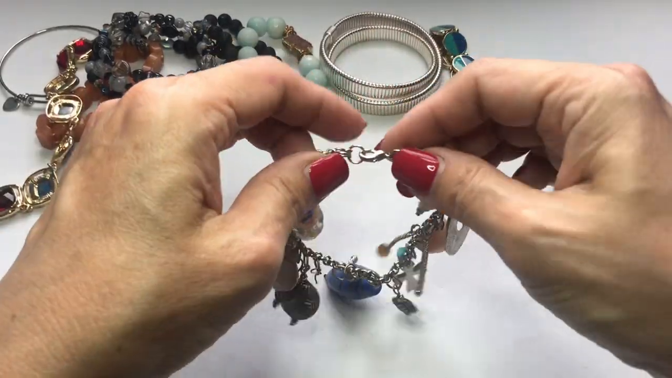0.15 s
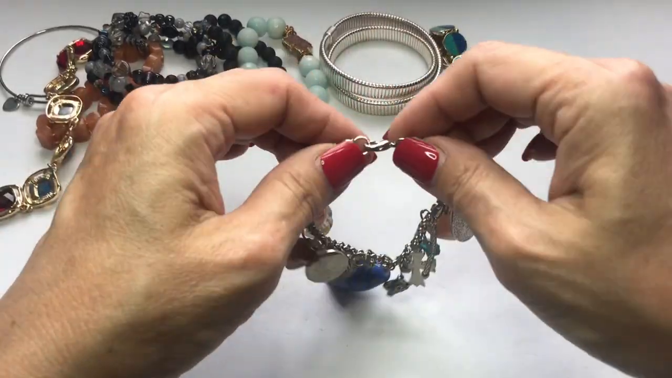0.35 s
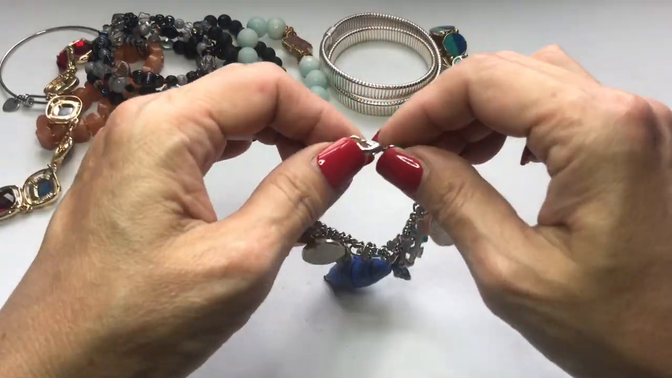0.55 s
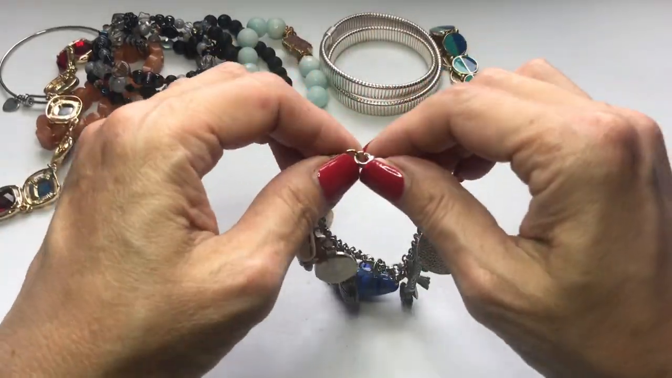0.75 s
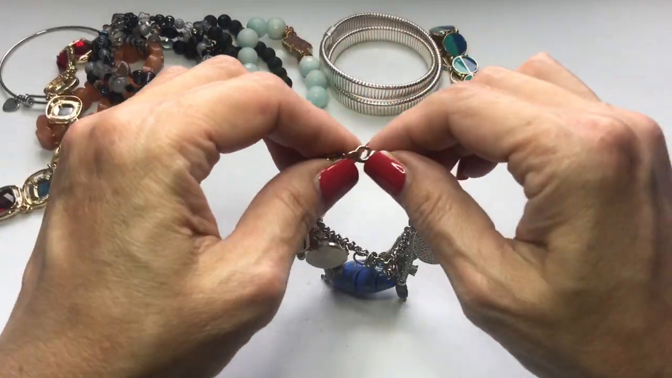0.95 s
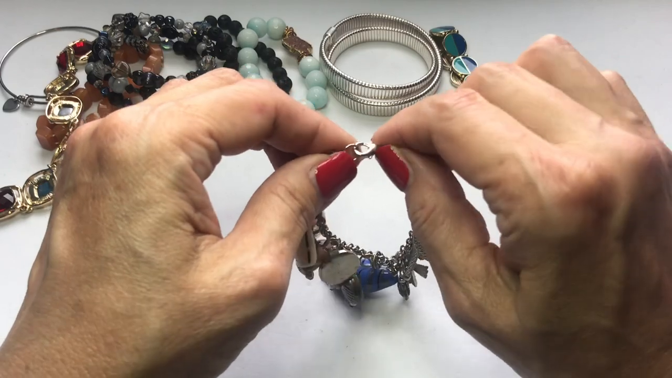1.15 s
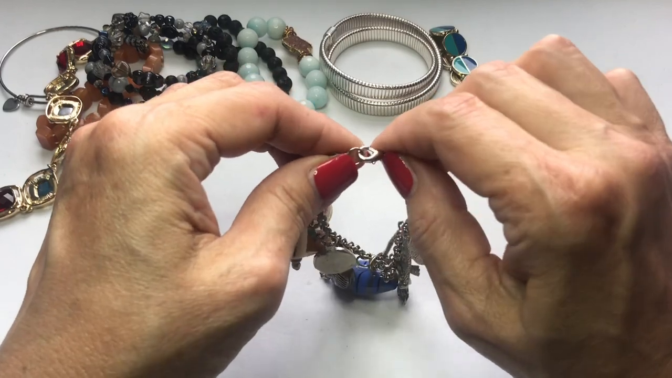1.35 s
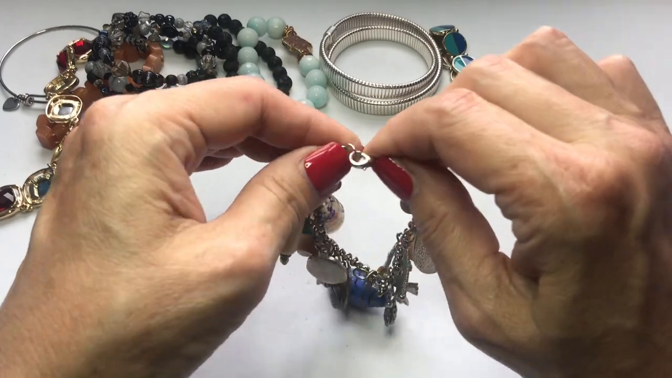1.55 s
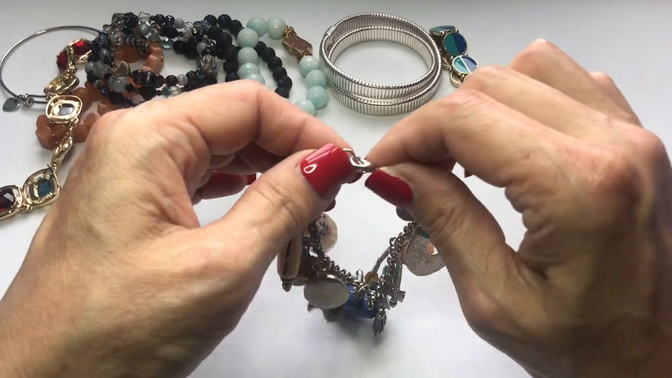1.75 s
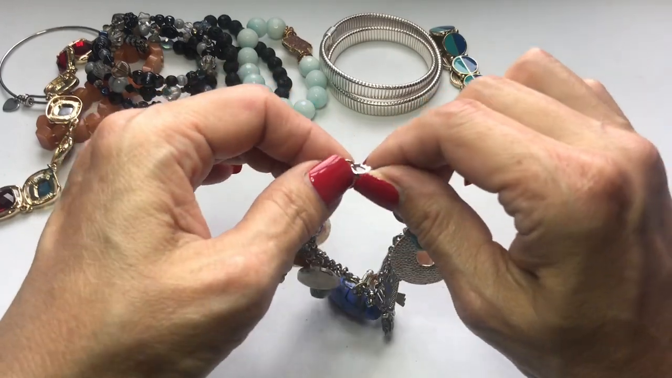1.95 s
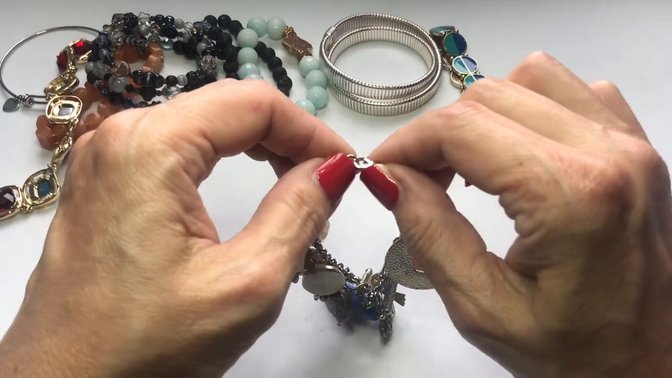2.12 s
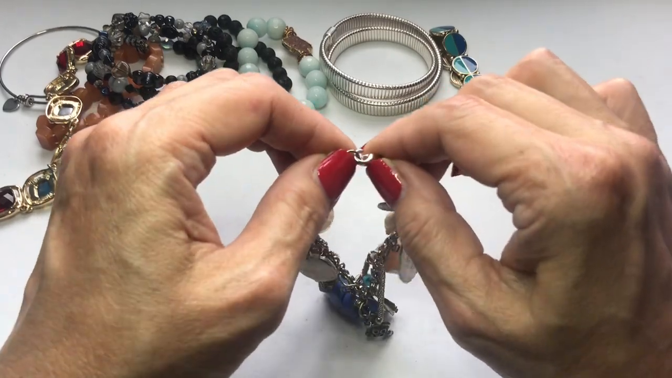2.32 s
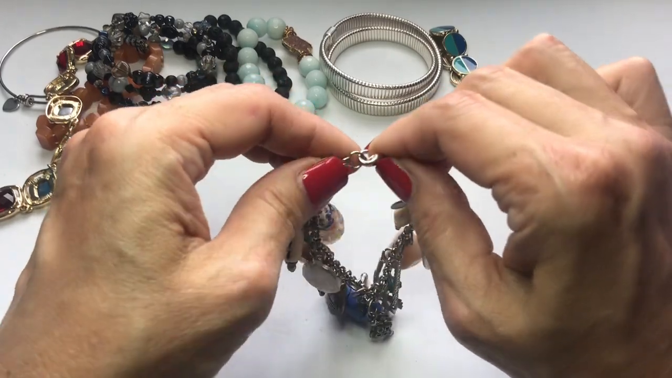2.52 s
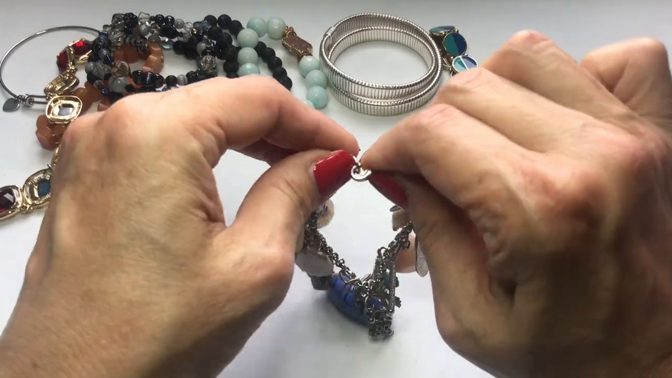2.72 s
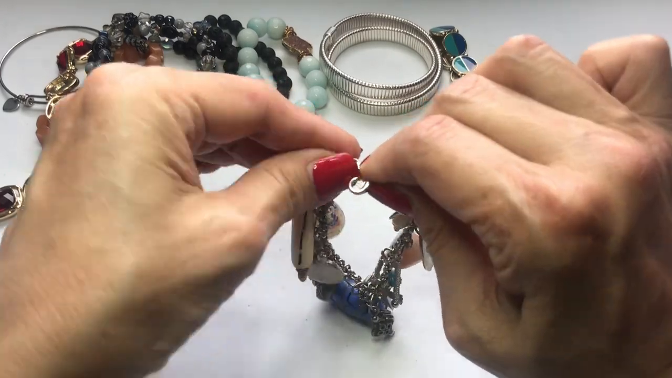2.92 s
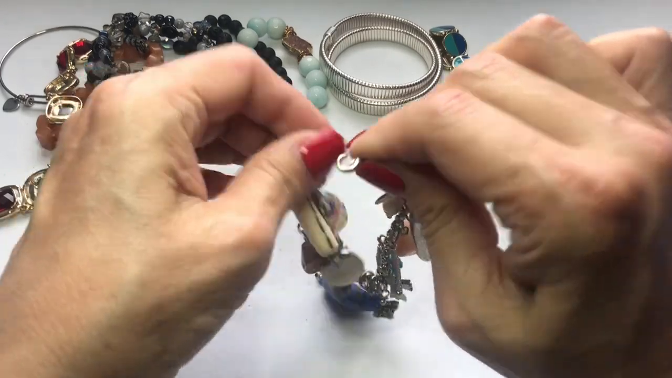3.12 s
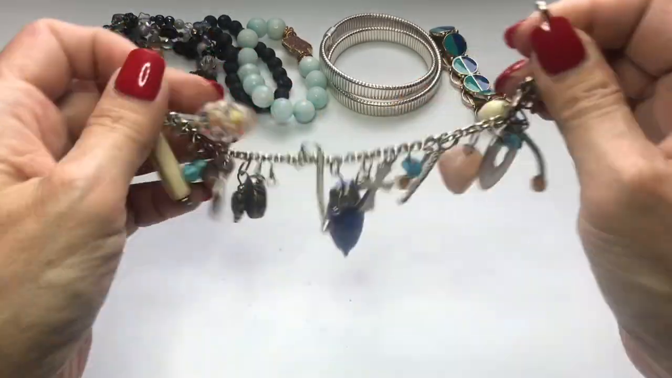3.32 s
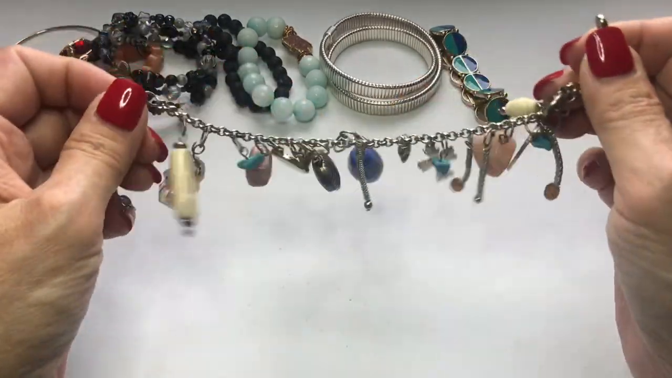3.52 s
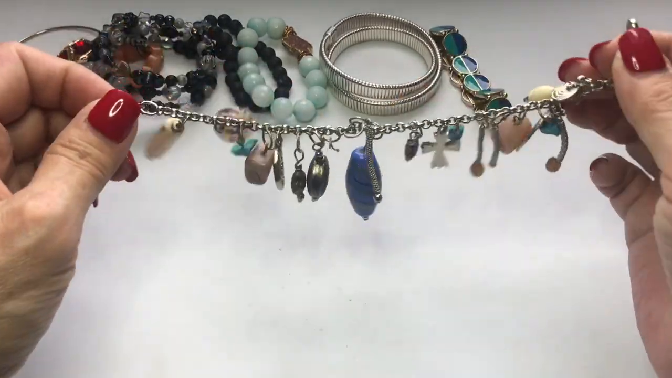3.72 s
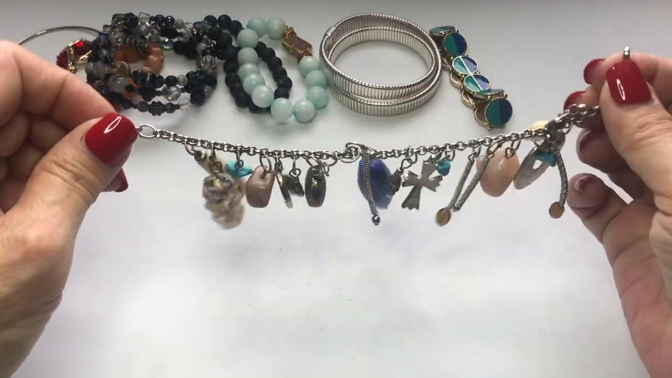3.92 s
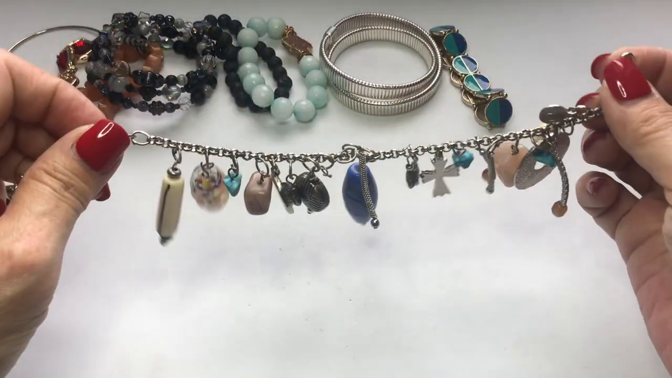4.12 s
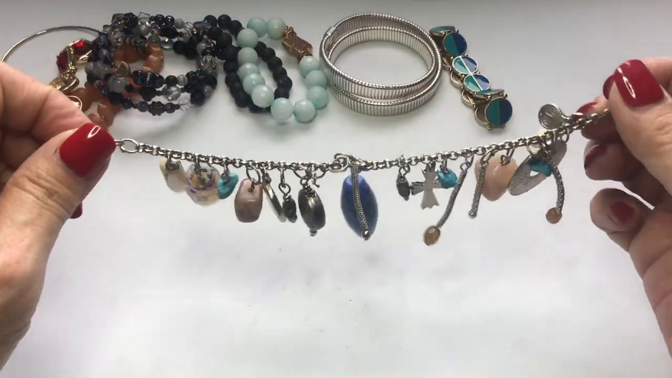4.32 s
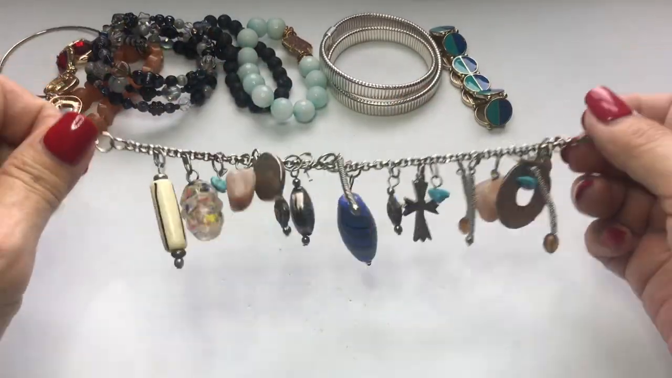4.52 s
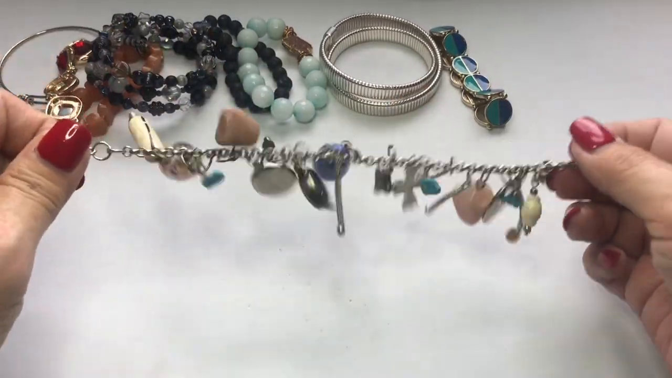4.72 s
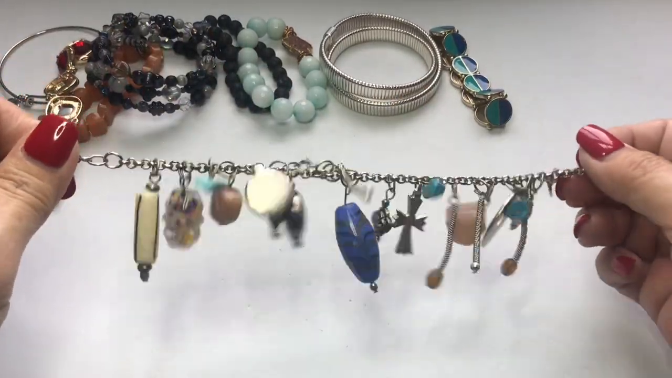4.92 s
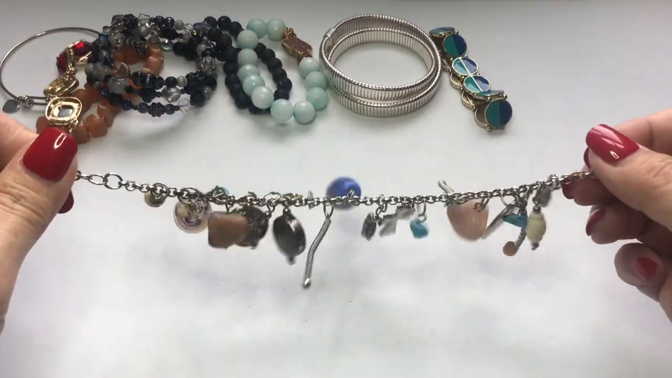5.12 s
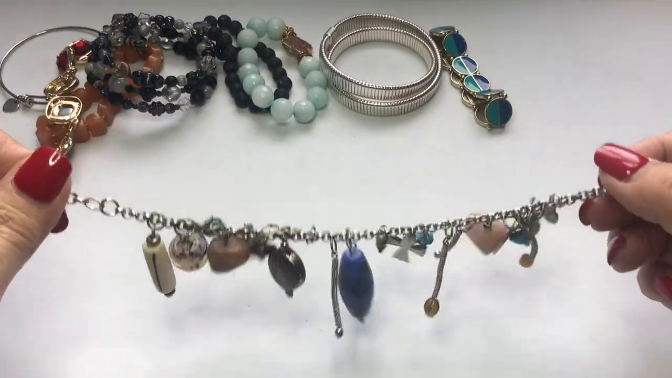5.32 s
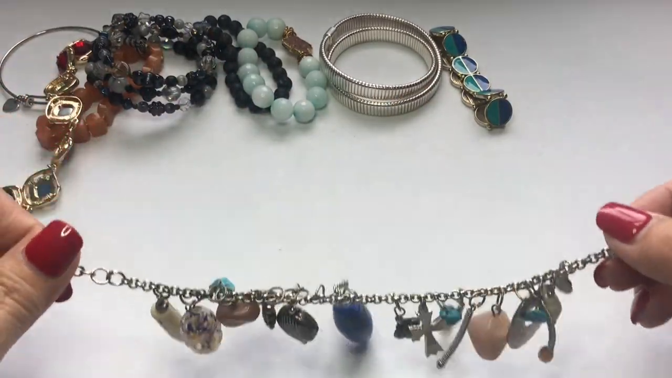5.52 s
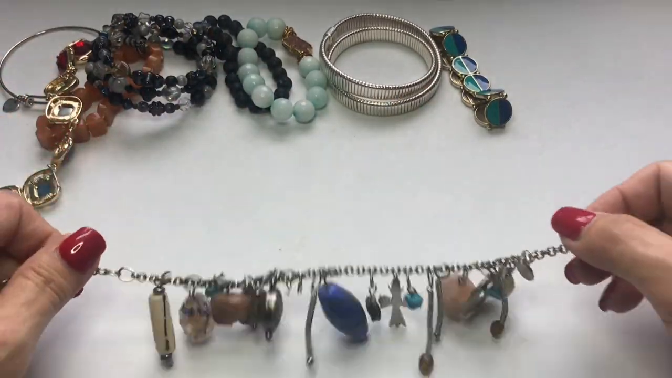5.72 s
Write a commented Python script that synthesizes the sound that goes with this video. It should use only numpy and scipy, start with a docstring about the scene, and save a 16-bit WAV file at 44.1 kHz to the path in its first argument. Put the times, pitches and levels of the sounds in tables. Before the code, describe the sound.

Close-up of a charm bracelet handled in a quiet room. A brief cluster of dry clicks and tiny rings opens it, then only isolated faint ticks for a couple of seconds. From about three seconds links and beads clatter in bright, irregular bursts, loudest when the chain is stretched and when it is shaken. Faint skin rustle, low hum, rumble and thin hiss lie underneath; the close microphone catches little echo.

```python
"""Two hands open a charm bracelet over a table in a quiet room, stretch it out and tip it to and fro.
At first there is hum, rumble, air and hiss, made of a sine and filtered noise; the chain rattles and rubs.
Beads and links soon clack as short filtered knocks; a flat charm, a pendant and small charms ring as tones.
The knocks thin out, then crowd together from about three seconds on, when a glass drop joins them.
Soft deep swells come and go; the low rumble is stronger near the end."""
import sys
import numpy as np
from scipy import signal
from scipy.fft import rfft, irfft, next_fast_len
from scipy.io import wavfile
from scipy.ndimage import uniform_filter1d

SR = 44100
rng = np.random.default_rng(int(sys.argv[2]) if len(sys.argv) > 2 else 0)


def transcribe(u):
    """Save the signal u as a 16-bit wav file named by the first command-line argument.

    u: samples, shape (n,) or (channels, n), limited to [-1, 1]; the rate is SR.
    q: integer samples, one column per channel.
    """
    v = np.clip(np.atleast_2d(u).T, -1, 1)
    q = np.round(v * 32767).astype(np.int16)
    wavfile.write(sys.argv[1], SR, q)


N = 254178  # length in samples

# Colour of the steady air and hiss, shape only: pitch_hz, level_db
AIR_COLOUR = [(20, -2.5), (200, 10.5), (400, 2.5), (800, -2.5), (1500, -7), (5000, -14), (7000, -23),
              (10500, -29), (14300, -20.5), (15700, -22.5), (15950, -55)]
AIR_DB = -67.5  # overall level of air and hiss
# Level of the mains hum over time: time_s, level_db
HUM_LEVEL = [(0, -59), (3.44, -60), (3.52, -81), (3.95, -68), (4.03, -65), (4.4, -56.5), (5.76, -60)]
HUM_HZ = 120.6
# Level of the low drone and rumble over time: time_s, level_db
LOW_LEVEL = [(0, -61), (1.4, -62.5), (1.65, -58), (2, -62), (2.25, -61), (3.75, -58.5), (4.07, -61),
             (4.45, -52.5), (5, -53.5), (5.76, -52)]
# Peaks of the rumble and of the drone: pitch_hz, width_hz, level_db
RUMBLE_PEAKS = [(48.3, 37, -1), (73, 25, -9), (103, 17, -9.5)]
DRONE_PEAKS = [(154.3, 78, 0.5), (211, 46, -14), (239.6, 35.4, 0), (344, 41.4, -6.5)]
RUMBLE_DB = -1.5  # against the drone
# Level of the faint chain rattle over time: time_s, level_db
RATTLE_LEVEL = [(0, -59.5), (.11, -65.5), (.3, -74), (.4, -72.5), (1.14, -76), (2.02, -71), (2.77, -75),
                (3.05, -68.5), (3.3, -57), (3.62, -60), (3.8, -69.5), (4.17, -72), (4.56, -66.5),
                (4.72, -52.5), (4.94, -57), (5.45, -70.5), (5.6, -68), (5.76, -61.5)]
LINK_HZ = 6480  # ring of the chain links
TICKS_PER_S = 450  # average rate of the larger link ticks
FINE_PER_S, FINE_DB = 2500, -6.0  # finest ticks of links sliding on links, against the larger ones
BRUSH_DB = -34  # how strongly the ticking links brush the flat charm
# Other small charms, one tone each: start_s, pitch_hz, level_db, time_to_fall_60_db_s
SMALL_CHARMS = [(.005, 6230, -60, .15), (.025, 2470, -59, .2), (.105, 2500, -64, .2), (.146, 2450, -64, .2),
                (.176, 2450, -60, .12), (.139, 8800, -57, .03), (.234, 5350, -47, .035),
                (.234, 8800, -52, .045), (3.245, 7940, -59, .045), (3.531, 11300, -56, .045)]
# Rustle of skin and sleeve: middle_s, length_s, level_db, centre_hz
RUBS = [(0.01, 0.066, -62.5, 2540), (0.322, 0.034, -68.5, 1090), (1.313, 0.024, -70, 1240),
        (1.47, 0.13, -69, 2600), (1.622, 0.088, -73.5, 780), (2.462, 0.056, -68, 3000),
        (3.515, 0.59, -66, 1390), (4.624, 0.77, -68.5, 1320), (5.14, 1, -69.5, 970),
        (5.723, 0.15, -66.5, 1240)]
# Distinct knocks of beads and links: peak_s, peak_level_db,
# weight_db (added to the lows), sparkle_db (added to the highs)
CLACKS = [(0.047, -40, -12, 4), (.1748, -21, -3, -3), (0.182, -36, 1.5, 5), (.1886, -36, 4, -9),
          (.201, -23, -3, 4), (0.2106, -28, 4, 8), (.2336, -31, 7, 3), (.27, -39, 5, 4.5),
          (0.2769, -43, -6, 7), (.2916, -39, -1.5, 1.5), (.2995, -36, -1, 6), (0.3085, -40.5, 0, -13),
          (.318, -42, -6, -9), (0.3414, -46, -4, -8), (.413, -43, 8, 7), (.4319, -38, 3, 8),
          (0.4434, -34.5, 12, -5), (0.4502, -30, 8, 4.5), (.47, -40.5, -4, 15), (0.5513, -30.5, -2.5, 8.5),
          (0.58, -35.5, -1, 3.5), (0.7016, -43, -5, -4), (0.7664, -44.5, 4, -12), (0.817, -42.5, 1, -2),
          (.898, -47, 0.5, -12), (0.9565, -45, 2, 1), (1.04, -44, 8, 4.5), (1.5238, -42.5, 6, -5),
          (1.5417, -40, 5, -5), (1.579, -36.5, -15, -2), (1.6108, -30, 1, -4), (1.6836, -42.5, 3, -18),
          (1.8114, -32.5, 2, 2.5), (1.841, -39.5, -6, -5), (1.9218, -27.5, 4.5, -4), (1.997, -39, 0, 1),
          (2.0579, -22.5, -1, -2), (2.3437, -38, -2, 2), (2.5404, -27, -5, -0.5), (2.6665, -39.5, 7.5, -4),
          (2.7988, -27.5, -2, 3), (2.8502, -43, -6, -7), (2.9, -34, 14, 4), (2.9897, -41.5, 9, -9),
          (3.017, -28.5, -1, 4), (3.0268, -39.5, 0, -2), (3.0367, -34, -3, 1), (3.083, -20, -7.5, -3),
          (3.091, -38, 0, -9), (3.1102, -39, 3, -18), (3.148, -38.5, -10, 0), (3.215, -35, -4, -13),
          (3.2222, -22, -11, 0), (3.2382, -30.5, 10, -15), (3.2526, -35, -9, 4), (3.298, -24.5, -17, 6),
          (3.301, -22, -7, -3), (3.3138, -24.5, 2, 4), (3.3188, -23.5, 3, 4), (3.4064, -18.5, -3, 5),
          (3.4178, -28, -9, 3), (3.486, -19, 0.5, 4), (3.4938, -30, -3, -3), (3.4997, -28.5, 6, 5),
          (3.51, -30, -5, -6), (3.5156, -28, -4, -6), (3.5328, -31.5, -28, -13), (3.5554, -10.5, -6.5, 4),
          (3.581, -19.5, -4, 1), (3.6079, -30, 14, -5), (3.6212, -8.5, -4, 5), (3.644, -28, -6, 3),
          (3.791, -30, -5, 1.5), (3.895, -19, -7.5, 3.5), (3.9013, -22, -6, -3), (3.9602, -29, -5, 5),
          (3.9653, -20, -8.5, 3.5), (3.9829, -31, -3, -11), (4.1946, -23.5, -4.5, 4.5),
          (4.2278, -25.5, -4, 3), (4.2694, -35, -1, 3), (4.3876, -32, -17.5, 1), (4.4261, -33.5, -20, -6),
          (4.6013, -25.5, -10, 5.5), (4.6203, -27, -1, 4), (4.6441, -31, -7.5, -1),
          (4.6494, -16.5, -0.5, -2), (4.6596, -31, 4, 3), (4.6771, -40, -7.5, 3), (4.6857, -22.5, -5, 5),
          (4.735, -23.5, 1.5, -21), (4.7629, -29.5, 10, 10), (4.7924, -23, 3, 4), (4.811, -25, -.6, 6),
          (4.8143, -13.5, -9, 8), (4.822, -18, -1, 12), (4.8282, -11.5, -41, 0), (4.8342, -12, -12, -2),
          (4.8403, -13, -3.5, 7), (4.8512, -26, 9.5, 5.5), (4.864, -30, 7, .6), (4.889, -23, 2, 7),
          (4.8938, -24.5, -6, 4), (4.9105, -26, -7, 23), (4.9197, -20.5, -6, 6), (4.9237, -22.5, -3.5, .6),
          (4.9321, -23, -21, 9), (4.992, -28.5, -3, 3), (5.0056, -30, -2, 1), (5.015, -34.5, -6, -3),
          (5.0214, -34, -9, -4.5), (5.0555, -16.5, -6, 3.5), (5.0648, -24.5, 3, -2), (5.0673, -25, 7.5, -4),
          (5.0765, -34, 7, -7), (5.0795, -28.5, 2, -5.5), (5.115, -15, 2, -1.5), (5.1712, -37, 5.5, -9),
          (5.1867, -26.5, -6.5, 5), (5.19, -33, -3, 8), (5.23, -28, 1, -2), (5.2862, -33.5, 0, -1),
          (5.315, -33.5, -6, 9), (5.3524, -39, 11, -3.5), (5.3671, -29.5, -2, 0.5), (5.3739, -22, -3, 10.5),
          (5.4298, -28.5, -2.5, -1), (5.441, -33, -5, 5), (5.4587, -29, 1, 5), (5.4847, -38, -3, -1),
          (5.507, -33, -0.5, 3), (5.528, -30, 1, -4), (5.664, -35.5, -13, 4.5), (5.6784, -22, -8.5, 1),
          (5.6839, -26, -30, -5), (5.7558, -31.5, -2, 4)]
# Colour shared by all knocks: pitch_hz, level_db
CLACK_COLOUR = [(400, -39), (1000, -15.5), (2000, -9.5), (4500, -2.5), (7000, 1), (8500, 3), (10300, 0),
                (12500, 2.5), (15700, -1), (16300, -24.5), (18000, -22.5)]
SCATTER, SCATTER_SPREAD_DB = 0.15, 3.0  # rebounds inside a knock, as gain against its snap
BOUNCES = 2  # later bounces per knock
BOUNCE_S, BOUNCE_DB, BOUNCE_SPREAD_DB = .007, -14.5, 2  # mean gap, level change and its spread per bounce
# Blows on the flat charm: start_s, level_db, hardness_db_per_octave (tilt around the main tone),
# spot_db (for the other tones), damping_factor (as it lies against others; below 1 counts as 1)
DISC_BLOWS = [(.146, -70, -4, 1, 1.2), (0.21, -66, -1.5, 7, 0.99), (2.305, -55.5, 10, 8, 1.7),
              (3.0015, -65, 14, 5, 2), (3.329, -51.5, 12, -9, 1.8), (3.376, -42.5, 2.2, 2.5, 0.96),
              (3.434, -71, 8, 8, 1.1), (3.485, -70, 14, -1, 0.93), (3.529, -43.5, -5, -9, 1.8),
              (3.694, -51.5, .6, -25, 2.4), (3.753, -60, 8, -12, 1.5), (4.552, -62, 3, 12.5, 0.84),
              (4.792, -74, -13, 10, 0.93), (4.8306, -39, 0.5, 5.5, 1.46), (4.905, -63, 3, 16, 0.95),
              (4.944, -50, -1, 6.5, 1), (4.992, -64, -9, 2, 1.1), (5.134, -67, -6, 5, 1),
              (5.226, -45.5, 0, 3.5, 2.7), (5.269, -71, -7, 6, 1.3), (5.331, -72, -5, 7, 1.44),
              (5.361, -56, 0, 1.5, 1.1), (5.493, -73, -1.7, 12, 1.06), (5.634, -60, -0.5, 7, 2.5)]
# Tones of the flat charm: pitch_hz, level_db, time_to_fall_60_db_s (before damping)
DISC_TONES = [(2450, -16, .15), (4200, -2, .09), (6230, -12, .04), (8300, 4, .14), (15560, -3, .09)]
MAIN_HZ = 8300  # main tone of the flat charm
# Blows on the small pendant: start_s, level_db, hardness_db (added to its high tone)
PENDANT_BLOWS = [(.233, -46.5, -3), (.277, -56, -15), (.6335, -64, -15), (2.4645, -48.5, 4),
                 (3.3194, -42, 19.5), (3.5124, -58, 14), (3.7209, -58, 15), (5.1745, -39, -7),
                 (5.316, -47, 7), (5.5345, -48.5, -15)]
# Tones of the pendant: pitch_hz, level_db, time_to_fall_60_db_s
PENDANT_TONES = [(9810, 0, .04), (15120, -16, .086)]
# Swells of a hollow band near 600 Hz: middle_s, length_s, level_db
HOLLOW_SWELLS = [(.33, 0.08, -71), (1.6, 0.13, -72), (3.1, 0.067, -75), (3.65, 0.54, -64.5),
                 (4.7, 0.99, -71), (5.5, 0.43, -73)]
# Peak of the hollow band: pitch_hz, width_hz, level_db
HOLLOW_PEAK = [(579, 134, 0)]
# Soft deep swells: middle_s, length_s, peak_level_db
THUDS = [(.47, .14, -54), (1.65, .25, -51.5), (2.16, 0.16, -48.5), (4.04, 0.1, -49), (4.37, 0.26, -43)]
THUD_HZ = 50.3
# Blows on the glass drop: start_s, level_db
GLASS_BLOWS = [(3.4058, -25.5), (3.9637, -38), (4.595, -45), (4.6194, -45.5), (4.6487, -33), (4.7564, -38),
               (4.9312, -52), (5.1156, -21), (5.3652, -41)]
# Tones of the glass drop: pitch_hz, time_to_fall_60_db_s
GLASS_TONES = [(12150, 0.018), (12370, 0.016)]
# How fast the echo dies at each pitch: pitch_hz, time_to_fall_60_db_s
ECHO_DECAY = [(1000, .1), (2500, .1), (5000, .12), (10000, .1), (16000, .07)]
ECHO_DB = -11.5  # echo against the direct sound
EDGE_HZ = 16800  # upper edge of the sound


def gain_of(db):
    """Turns decibels into a gain."""
    return 10 ** (np.asarray(db) / 20)


def evened(x):
    """Scales a signal to an average (rms) level of 1."""
    return x / np.sqrt(np.mean(x ** 2) + 1e-30)


def read(points, hz):
    """Reads a table at the given pitches, with straight lines on a log pitch scale."""
    f, value = np.transpose(points)
    return np.interp(np.log(hz + 1), np.log(f + 1), value)


def curve(table):
    """Turns a table of times and levels into a gain for every sample."""
    time_s, level_db = np.transpose(table)
    return gain_of(np.interp(np.arange(N) / SR, time_s, level_db))


def swells(events):
    """Gain that rises and falls smoothly around the middle of each event."""
    t = np.arange(N) / SR
    return sum(gain_of(db) * np.exp(-(2 * (t - middle) / length) ** 2) for middle, length, db in events)


def add(mix, s, sound):
    """Mixes a sound in at time s."""
    part = mix[max(round(s * SR), 0):][:len(sound)]
    part += sound[:len(part)]


def noise(gain):
    """Steady noise at rms 1, coloured by a function that gives the gain at each pitch."""
    size = next_fast_len(N)
    spectrum = rfft(rng.standard_normal(size))
    colour = gain(np.fft.rfftfreq(size, 1 / SR))
    return evened(irfft(spectrum * colour, size)[:N])


def humps(peaks):
    """Spectrum made of resonance peaks; each width is taken at half the peak's gain."""
    return lambda hz: sum(gain_of(db) / (1 + (2 * (hz - f) / width) ** 2) for f, width, db in peaks)


def wobble(db):
    """Slow uneven swelling, made of low-pitched noise used as a level in dB."""
    return gain_of(db * noise(humps([(2.3, 3.7, 0)])))


def tone(hz, db, t60):
    """A struck tone: a close pair that beats and dies away, slightly detuned at random."""
    t = np.arange(6000) / SR
    detune, split = rng.standard_normal(2)
    turns = hz * (1 + 0.0013 * detune) * t
    partner_turns = turns + 45 * split * t  # typically up to some tens of Hz away
    swing = np.sin(2 * np.pi * turns) + .3 * np.sin(2 * np.pi * partner_turns)
    onset = np.minimum(t / 0.0011, 1)
    return gain_of(db - 60 * t / t60) * onset * swing


def knocks(weight_db, sparkle_db, decay_ms, lumpy_db):
    """One knock per row, peak 1: a snap and a brief scatter of tiny rebounds, in an uneven colour."""
    hz, t = abs(np.fft.fftfreq(512, 1 / SR)), np.arange(512) / SR
    chance = rng.standard_normal((len(weight_db), 2, 512))
    # Smoothed noise makes each spectrum lumpy; its mirror image keeps both halves alike.
    smooth = uniform_filter1d(uniform_filter1d(chance[:, 0], size=10), size=10)
    lumps_db = lumpy_db * evened(smooth)
    lumps_db = lumps_db + np.roll(lumps_db[:, ::-1], 1, axis=1)
    low = np.clip((6000 - hz) / 2500, 0, 1)
    high = np.clip((hz - 9500) / 2500, 0, 1)
    colour_db = read(CLACK_COLOUR, hz) + np.outer(weight_db, low) + np.outer(sparkle_db, high) + lumps_db
    scatter = SCATTER * gain_of(SCATTER_SPREAD_DB * chance[:, 1, :1])
    blow = scatter * chance[:, 1] * np.exp(-t / (decay_ms / 1000))
    blow[:, 0] = 1  # the snap
    # Minimum phase: nothing sounds before the blow.
    causal = np.exp(np.conj(signal.hilbert(np.log(gain_of(colour_db)))))
    out = np.fft.ifft(np.fft.fft(blow) * causal).real
    return out / abs(signal.hilbert(out)).max(axis=1, keepdims=True)


def air_and_hiss():
    """The air of the room and the hiss of the microphone: one steady coloured noise."""
    return gain_of(AIR_DB) * noise(lambda hz: gain_of(read(AIR_COLOUR, hz)))


def mains_hum():
    """A single low sine whose level follows a table and wavers slightly."""
    t = np.arange(N) / SR
    sine = np.sqrt(2) * np.sin(2 * np.pi * HUM_HZ * t)  # rms 1
    return sine * wobble(0.58) * curve(HUM_LEVEL)


def rumble_and_drone():
    """Two low noises with resonance peaks, each swelling unevenly under one common level."""
    rumble = noise(humps(RUMBLE_PEAKS)) * wobble(1.5)
    drone = noise(humps(DRONE_PEAKS)) * wobble(1.5)
    return (gain_of(RUMBLE_DB) * rumble + drone) * curve(LOW_LEVEL)


def random_ticks(size_db, per_s):
    """Single-sample blows of mixed size at random times, scaled to rms 1."""
    sizes = gain_of(size_db * np.minimum(rng.exponential(1, N), 3.5))
    return evened(sizes * (rng.random(N) < per_s / SR))


def chain_rattle():
    """Countless faint ticks as the chain moves; they ring the links and brush the flat charm."""
    weight_db = -2.0 + 6.0 * rng.standard_normal(48)
    sparkle_db = 4.4 * rng.standard_normal(48)
    kinds = knocks(weight_db, sparkle_db, decay_ms=1.1, lumpy_db=2.5)
    ticks = random_ticks(4.8, TICKS_PER_S) + gain_of(FINE_DB) * random_ticks(5.3, FINE_PER_S)
    # Every tick is voiced by one of the 48 knocks.
    kind = rng.integers(0, len(kinds), N)
    out = sum(signal.oaconvolve(ticks * (kind == k), knock)[:N] for k, knock in enumerate(kinds))
    ring = signal.lfilter(*signal.iirpeak(LINK_HZ, 9.0, SR), out)
    moving = evened(out + 0.37 * ring) * curve(RATTLE_LEVEL)
    brushed = np.zeros(N)
    for hz, db, t60 in DISC_TONES:
        width = np.log(1000) / np.pi / t60  # a longer ring means a narrower resonance
        resonance = signal.lfilter(*signal.iirpeak(hz, hz / width, SR), moving)
        brushed += gain_of(db) / np.sqrt(width / SR) * resonance
    return moving + gain_of(BRUSH_DB) * brushed


def small_charms():
    """Each small charm rings one struck tone."""
    out = np.zeros(N)
    for s, *mode in SMALL_CHARMS:
        add(out, s, tone(*mode))
    return out


def rustle():
    """Grainy rubbing of skin and sleeve: each stroke is noise in a wide band of its own."""
    grain = gain_of(3.3 * evened(uniform_filter1d(rng.standard_normal(N), size=300)))
    return grain * sum(noise(humps([(hz, 2.5 * hz, 0)])) * swells([stroke]) for *stroke, hz in RUBS)


def clacks():
    """The distinct knocks of beads and links, each followed by fainter bounces."""
    s, peak_db, weight_db, sparkle_db = np.transpose(CLACKS)
    out = np.zeros(N)
    sounds = knocks(weight_db, sparkle_db, decay_ms=1.54, lumpy_db=1.29)
    shape = (len(s), BOUNCES)
    gaps_s = BOUNCE_S * (.5 + rng.random(shape)).cumsum(axis=1)
    losses_db = (BOUNCE_DB + BOUNCE_SPREAD_DB * rng.standard_normal(shape)).cumsum(axis=1)
    for at, db, knock, gaps, losses in zip(s, peak_db, sounds, gaps_s, losses_db):
        peak_delay_s = abs(knock).argmax() / SR  # the table times the loudest moment
        for gap, loss_db in [(0, 0), *zip(gaps, losses)]:
            add(out, at + gap - peak_delay_s, gain_of(db + loss_db) * knock)
    return out


def flat_charm():
    """The flat charm rings; hardness and spot of the blow set its mix of tones, contact damps them."""
    out = np.zeros(N)
    for s, blow_db, hard_db, spot_db, damping in DISC_BLOWS:
        for hz, db, t60 in DISC_TONES:
            is_other_tone = abs(hz / MAIN_HZ - 1) > 1 / 10
            colour_db = hard_db * np.log2(hz / MAIN_HZ) + spot_db * is_other_tone
            add(out, s, tone(hz, blow_db + db + colour_db, t60 / max(damping, 1)))
    return out


def pendant():
    """The small pendant rings two tones; the hardness of the blow sets the higher one."""
    out = np.zeros(N)
    for s, blow_db, hard_db in PENDANT_BLOWS:
        for k, (hz, db, t60) in enumerate(PENDANT_TONES):
            add(out, s, tone(hz, blow_db + db + k * hard_db, t60))
    return out


def hollow_band():
    """Noise around one resonance, heard as hollow swells."""
    return noise(humps(HOLLOW_PEAK)) * swells(HOLLOW_SWELLS)


def deep_swells():
    """A very low sine that softly rises and falls."""
    t = np.arange(N) / SR
    return np.sin(2 * np.pi * THUD_HZ * t) * swells(THUDS)


def glass_drop():
    """The glass drop gives two high tones close together that die very quickly."""
    out = np.zeros(N)
    for s, db in GLASS_BLOWS:
        for hz, t60 in GLASS_TONES:
            add(out, s, tone(hz, db, t60))
    return out


def echo(x):
    """Table and walls: sparse taps of random sign, each band dying at its own speed."""
    taps = np.zeros(16000)
    at = np.arange(60, 15960, 20)
    taps[at + rng.integers(0, 20, len(at))] = rng.choice([-1., 1.], len(at))
    hz, t, bands = signal.stft(taps, SR, nperseg=128)
    fading = gain_of(-60 * t / read(ECHO_DECAY, hz)[:, None])
    tail = signal.istft(bands * fading, SR, nperseg=128)[1]
    return signal.oaconvolve(x, tail / np.linalg.norm(tail))[:N]


def scene():
    """The bracelet close by, with its echo, in the room; the room sounds get no echo."""
    bracelet = chain_rattle() + small_charms() + clacks() + flat_charm() + pendant() + glass_drop()
    room = air_and_hiss() + mains_hum() + rumble_and_drone() + rustle() + hollow_band() + deep_swells()
    return (bracelet + gain_of(ECHO_DB) * echo(bracelet) + room)[None]


def record(dry):
    """A low-pass filter removes what lies above the upper edge."""
    lowpass = signal.firwin(255, EDGE_HZ, window=("kaiser", 9), fs=SR)
    return signal.oaconvolve(dry, lowpass[None], "same")


dry = scene()
out = record(dry)
transcribe(out)
```